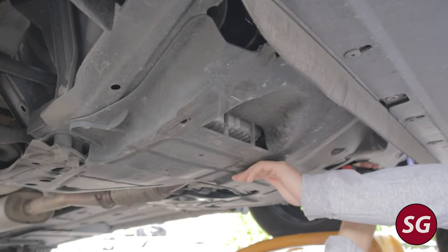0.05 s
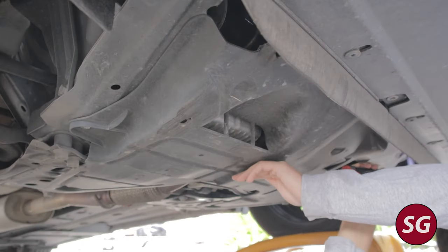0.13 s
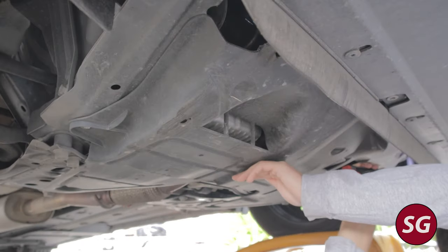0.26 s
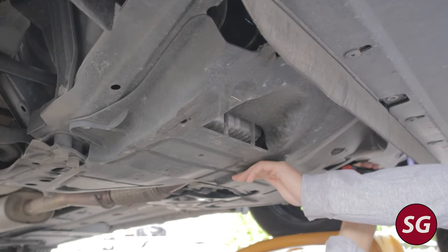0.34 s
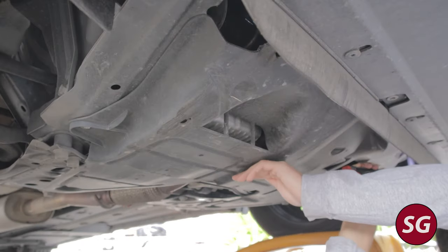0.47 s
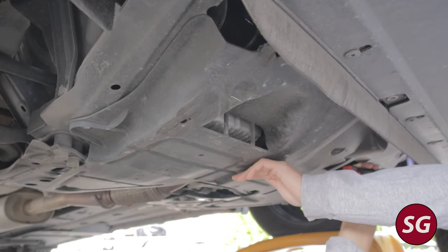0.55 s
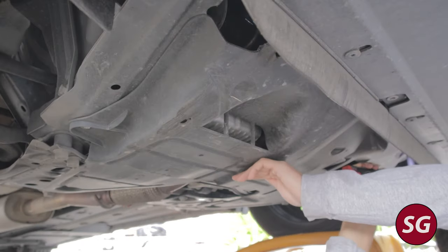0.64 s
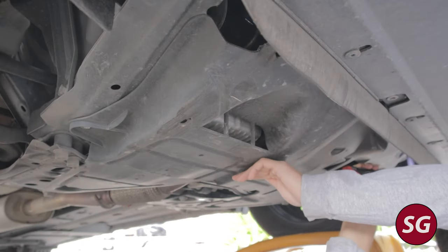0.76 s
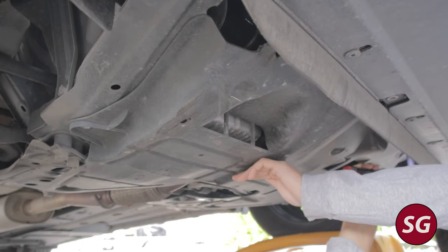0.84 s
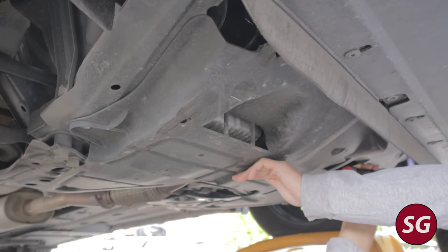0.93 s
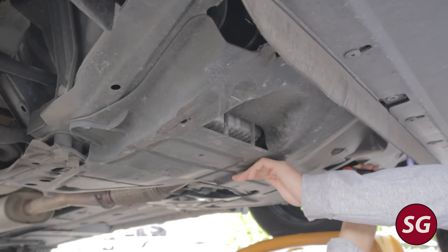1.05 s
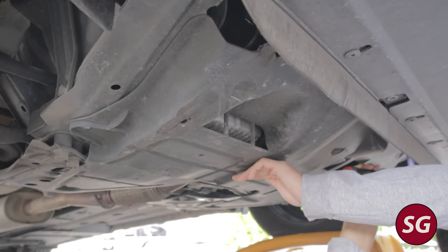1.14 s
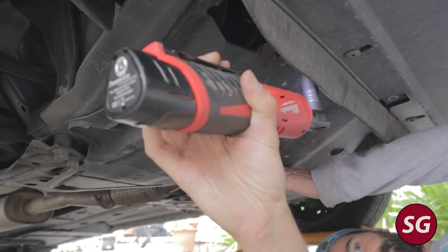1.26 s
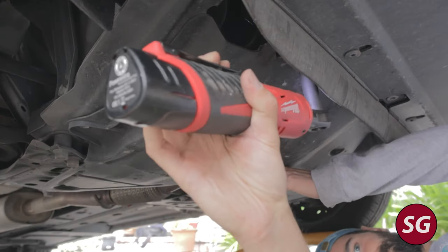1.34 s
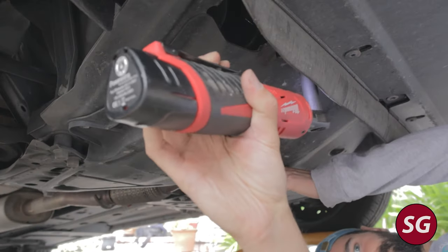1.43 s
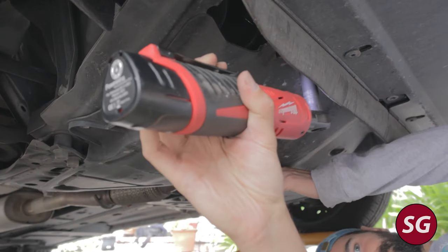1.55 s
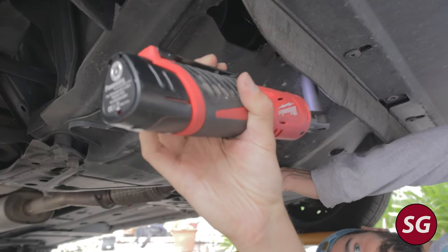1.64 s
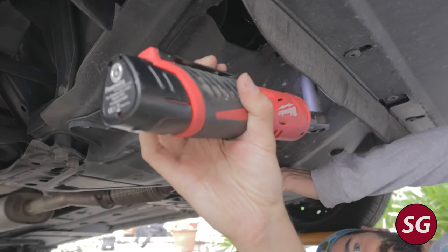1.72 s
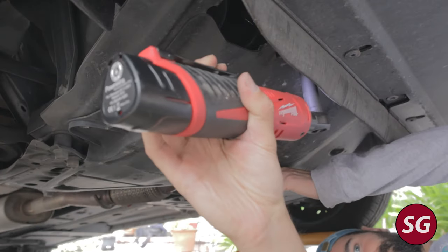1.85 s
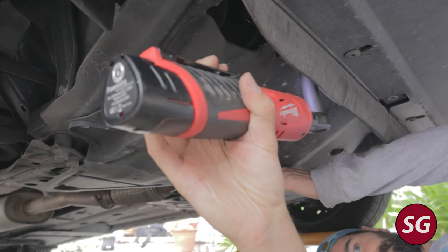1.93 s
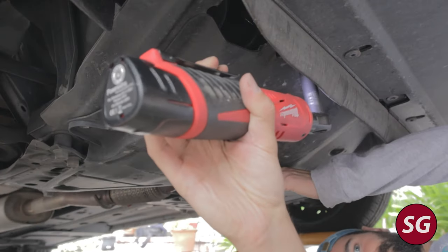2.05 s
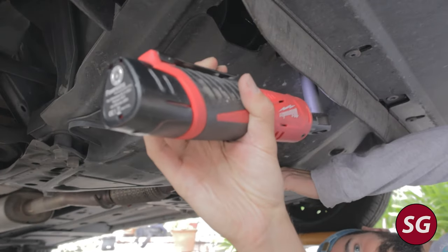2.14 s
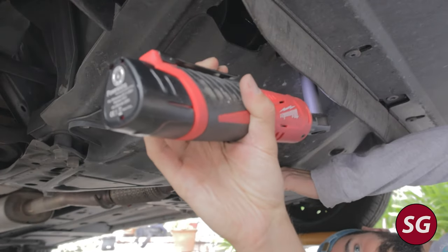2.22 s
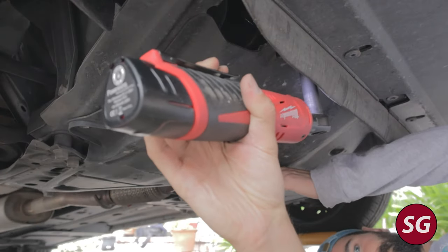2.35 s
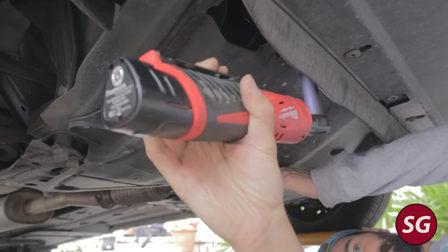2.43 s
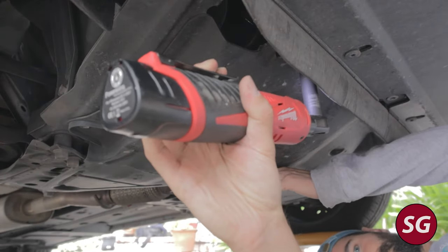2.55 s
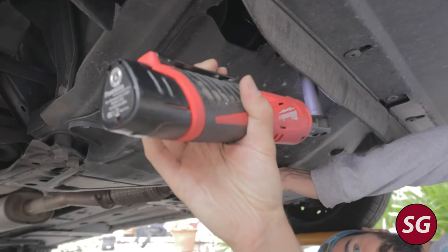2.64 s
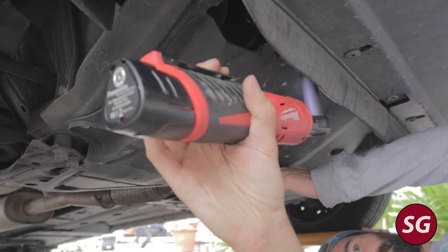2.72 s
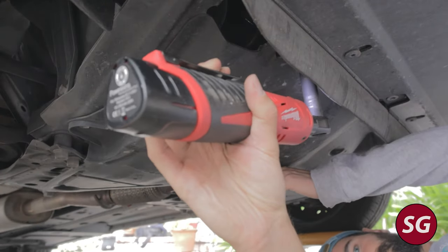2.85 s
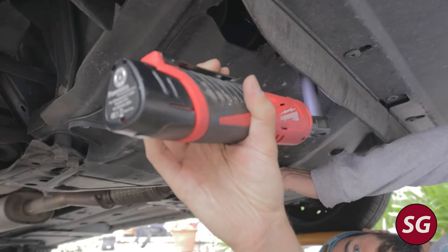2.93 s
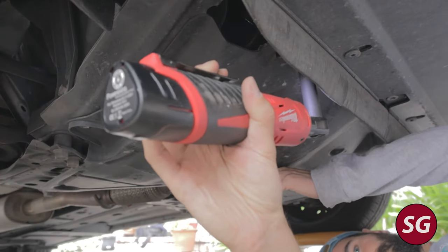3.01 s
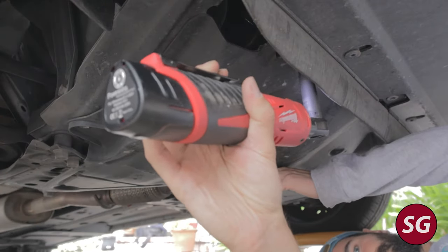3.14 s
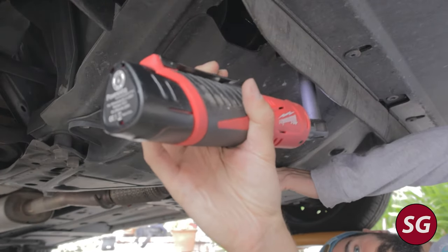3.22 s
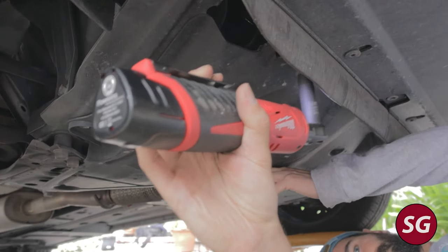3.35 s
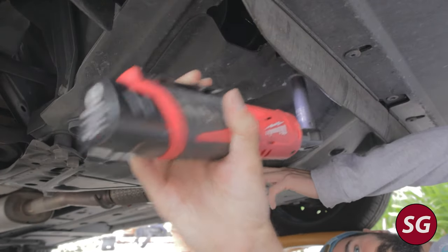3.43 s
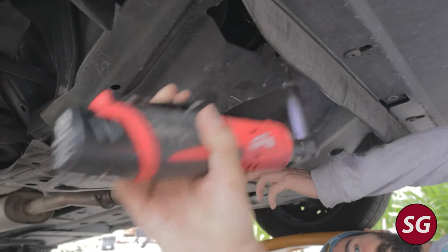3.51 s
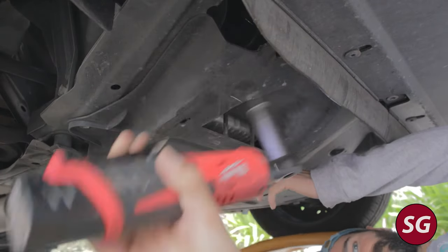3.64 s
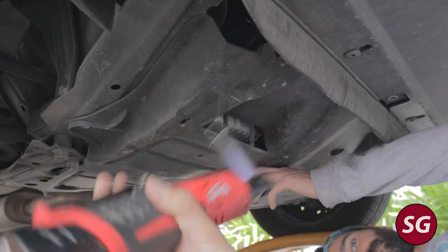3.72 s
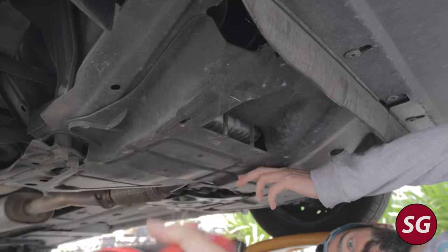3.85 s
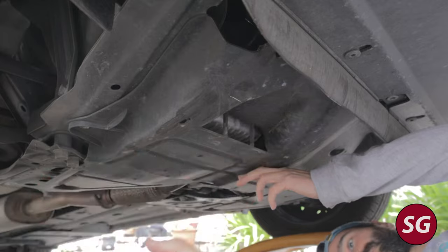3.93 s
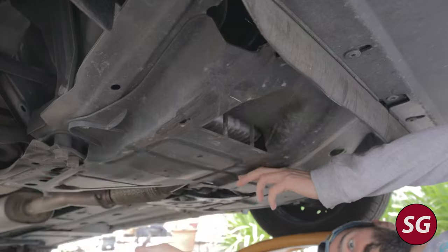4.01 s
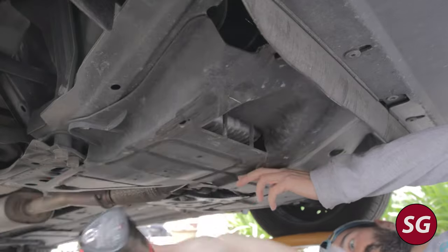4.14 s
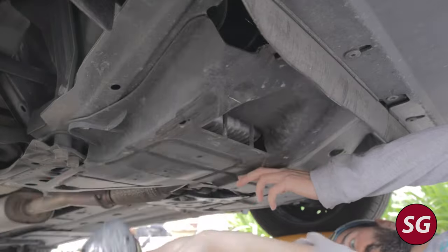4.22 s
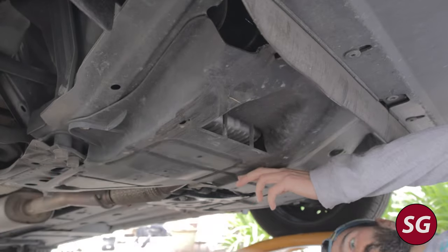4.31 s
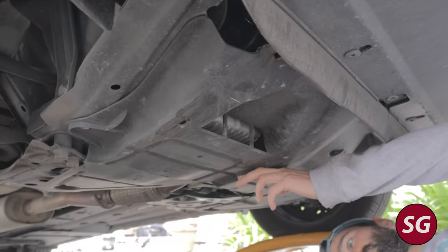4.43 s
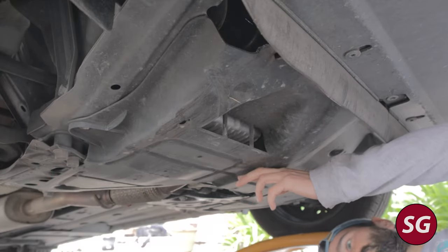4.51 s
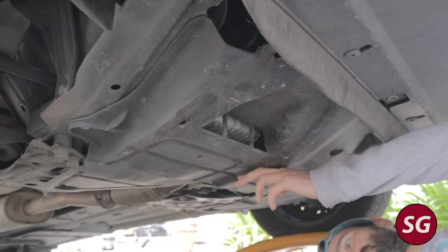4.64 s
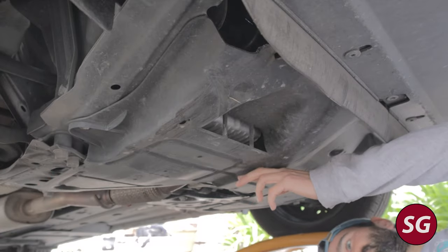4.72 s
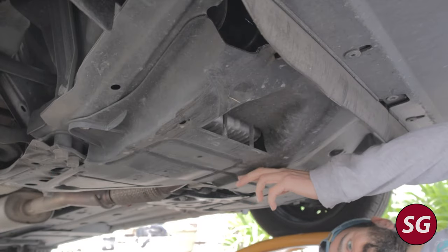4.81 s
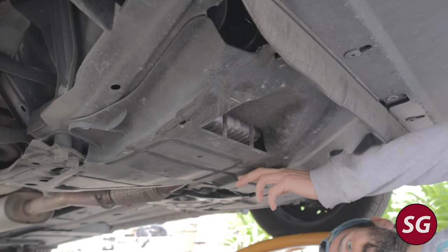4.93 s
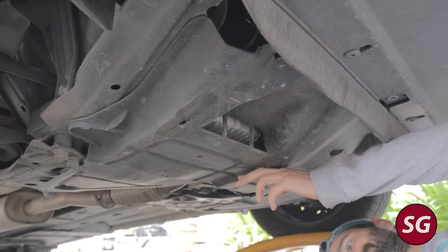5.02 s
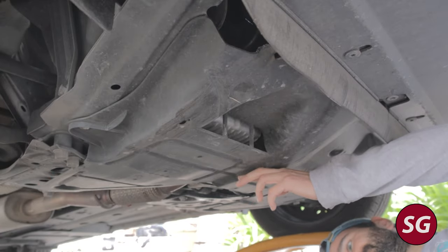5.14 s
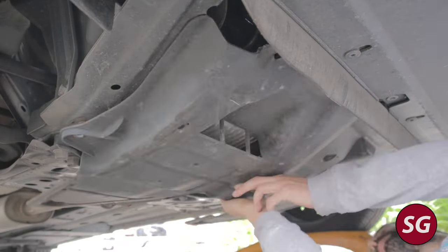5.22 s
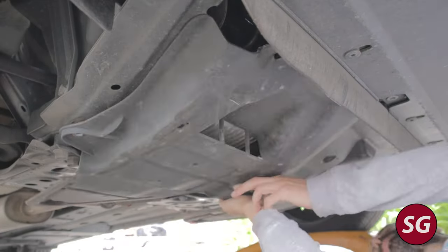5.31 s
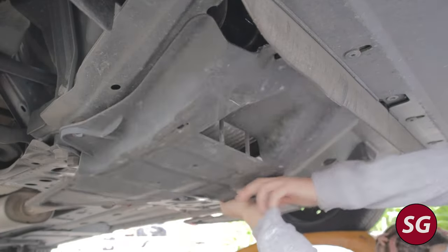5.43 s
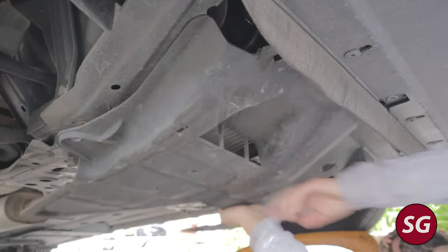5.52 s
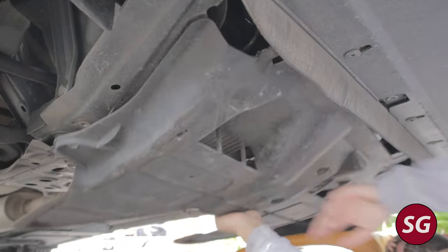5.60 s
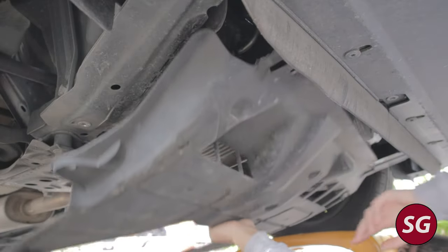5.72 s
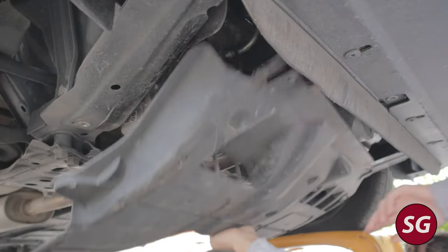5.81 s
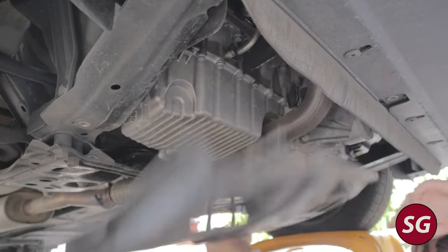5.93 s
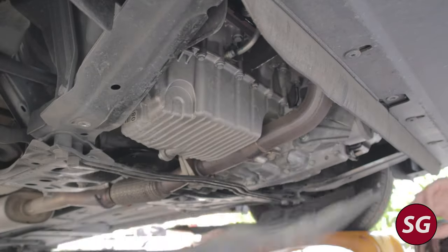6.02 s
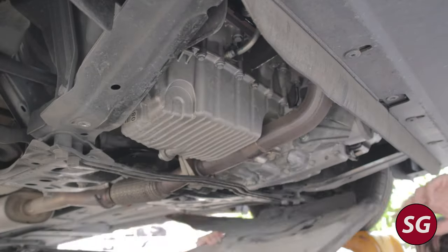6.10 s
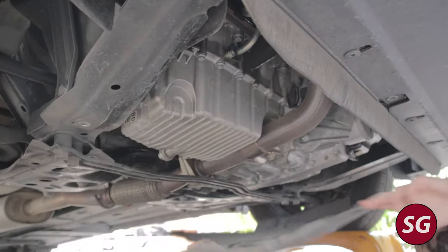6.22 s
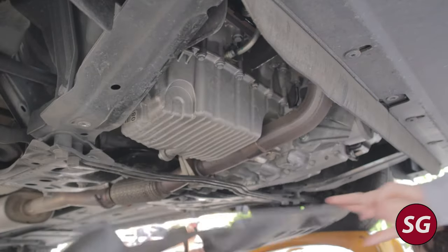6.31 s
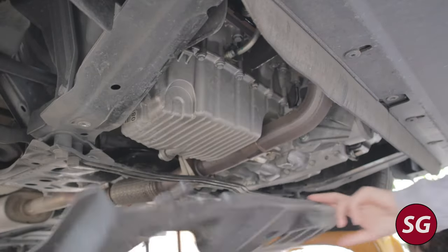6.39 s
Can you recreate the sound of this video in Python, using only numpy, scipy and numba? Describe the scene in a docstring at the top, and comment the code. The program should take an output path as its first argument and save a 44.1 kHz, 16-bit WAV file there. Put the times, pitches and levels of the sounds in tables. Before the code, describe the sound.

Close under a car in an open garage, a cordless ratchet rattles steadily on one bolt, then on a second with a slightly different metallic colour. Released, it slows to separate clicks and stops. Small steel taps follow in the quiet, then metal clanks with a short ring while a plastic shield is dragged away with scrapes, bumps and a last thump. Faint air beneath, mono and mostly dry.

```python
"""A cordless ratchet turns out two bolts of a car's splash shield in succession: periodic impacts of yoke,
pawl and gears excite the resonances of tool and underbody. The tool coasts to rest, its last teeth clicking.
Loose steel then taps, each contact exciting short damped modes. The plastic shield is dragged off by
stick and slip, bumping as it goes, while a piece of metal clanks down and rings in decaying modes.
Faint broadband air of an open garage lies beneath throughout."""
import sys
import numpy as np
from scipy import signal
from scipy.fft import rfft, irfft
from scipy.io import wavfile
from numba import njit

SR = 44100
rng = np.random.default_rng(int(sys.argv[2]) if len(sys.argv) > 2 else 0)


def master(y):
    """Save y as 16-bit WAV."""
    cut = np.clip(np.atleast_2d(y).T, -1, 1)
    pcm = np.round(cut * 32767)  # scale
    wavfile.write(sys.argv[1], SR, pcm.astype(np.int16))


N = 284930
T = np.arange(N) / SR  # time [s]
GRID = np.maximum(np.arange(4097) * SR / 8192, 1)  # frequencies of a response [Hz]
HALF_SECOND = SR // 2  # length of a single impact sound [samples]
TOP_HZ = 15800

# Garage air, spectrum: (frequency [Hz], level [dB])
AIR_SPECTRUM = [(18, -27.5), (30, -26.5), (92, -6), (185, -12.5), (247, -13.5), (511, -16.5), (735, -12.5),
                (815, -15), (978, -11), (1780, -22), (15000, -39.5)]
AIR_DB = -83

# Plastic shield, radiated spectrum: (frequency [Hz], level [dB])
SHIELD_SPECTRUM = [(24, -63), (60, 0.5), (150, -5.5), (227, -4.5), (300, -5.5), (410, -7.5), (540, -5.5),
                   (676, -6.5), (866, -5), (1080, -3), (1430, -11), (1800, -13.5), (2350, -17),
                   (3100, -21.5), (3850, -18.5), (4400, -20.5), (6460, -28), (15000, -34)]
# Effort of dragging the shield, which builds until it slips free: (time [s], scrape level [dB])
DRAG_EFFORT = [(5.25, -65), (5.33, -59), (5.5, -69.5), (5.57, -64.5), (5.68, -58.5), (5.75, -57),
               (5.82, -55.5), (5.843, -47.5), (5.865, -46.5), (5.895, -45), (5.915, -55), (5.96, -63),
               (6.22, -68), (6.46, -66.5)]
# Brief noisy swells: a soft handling rustle, the rattling tail of a tap, then scuffs of the shield:
# (time [s], length [s], level [dB])
NOISY_SWELLS = [(4.11, 0.11, -79), (4.988, 0.077, -64), (5.479, 0.18, -63), (5.813, .12, -74),
                (5.93, 0.38, -68.5), (6.407, 0.11, -59.5)]
SWELL_RISE = 0.14  # share of a noisy swell spent rising
# Grit relative to the scrape; flexing of the sheet under a light scrape, and its growth [dB per dB]
GRIT_DB, LIGHT_SCRAPE_DB, FLEX_DB, FLEX_GROWTH = -9.5, -58.5, -64.5, 0.38
# Bumps of the shield: (time [s], level [dB], ring [Hz], t60 [s])
SHIELD_BUMPS = [(4.195, -69, 168, 0.081), (5.251, -59, 216, 0.049), (5.292, -53, 324, 0.17),
                (5.333, -42.5, 151, 0.043), (5.336, -37.5, 624, 0.041), (5.339, -46, 334, 0.073),
                (5.35, -63, 560, .06), (5.38, -46.5, 127, 0.16), (5.451, -47, 174, 0.035),
                (5.453, -51, 620, 0.071), (5.535, -57, 1100, 0.026), (5.535, -52, 150, .05),
                (5.581, -58, 220, 0.046), (5.631, -59, 600, .06), (5.702, -45, 1270, 0.023),
                (5.76, -45, 232, 0.097), (5.787, -43, 600, 0.085), (5.806, -46, 230, 0.06),
                (5.8496, -35.5, 420, 0.03), (5.8502, -48, 1080, 0.02), (5.891, -42, 1050, 0.022),
                (5.8965, -32, 657, 0.022), (5.914, -40, 682, 0.081)]
# Judders of its catching edge: (time [s], length [s], level at the start [dB])
EDGE_SKIDS = [(5.547, 0.099, -59.5), (5.62, 0.037, -60), (5.662, 0.042, -60), (5.698, 0.14, -52.5),
              (5.805, 0.037, -47), (5.844, 0.039, -46), (5.888, 0.021, -46)]
# Modes of the juddering sheet: (frequency [Hz], width [Hz], level [dB])
SKID_MODES = [(603, 36, 1), (785, 34, -3), (1050, 42, -1), (1214, 41, 0), (1460, 46, -2)]

# Metal set down, with its bounces: (time [s], level [dB])
CLANK_IMPACTS = [(5.2871, -38.5), (5.288, -40.5), (5.295, -38.5), (5.301, -38.5), (5.309, -48),
                 (5.321, -59)]
# Modes of that metal: (frequency [Hz], level [dB], t60 [s])
CLANK_MODES = [(307, -2, .3), (598, -3, .25), (818, -7, .2), (953, -8, .24), (1114, 3, .72),
               (1324, -14, .37), (2050, -7, .3), (2740, -13, .2), (4000, -6, .08), (5260, 0, .11),
               (10040, -12, .2), (11630, -6, .12)]
# Spectrum of its crash: (frequency [Hz], level [dB])
CRASH_SPECTRUM = [(59, -64), (100, -24), (324, 8.5), (942, -30), (1090, -3), (3250, -10), (5260, -4.5),
                  (6760, -13.5), (11900, -20), (15000, -24)]

# Taps of loose steel and grit: (time [s], level [dB], main ring [Hz], second ring [Hz], treble [dB])
STEEL_CLICKS = [(4.058, -46, 2340, 4500, -6.5), (4.298, -59.5, 2000, 3660, -10),
                (4.38, -65, 1900, 1400, -16), (4.392, -51.5, 2400, 4000, 0), (4.398, -47.5, 2350, 3500, -5),
                (4.413, -49, 3530, 2300, -3), (4.417, -46, 4060, 2500, -3), (4.426, -46, 2080, 3500, -4),
                (4.43, -43, 3950, 3000, -1.5), (4.513, -64, 2690, 4000, -5), (4.592, -67, 2400, 3500, -11),
                (4.643, -40, 4000, 3450, 0), (4.6456, -42, 3800, 2300, -7.5),
                (4.744, -43.5, 3520, 2030, -3.5), (4.834, -66, 3000, 7000, 3), (4.84, -49, 2240, 3000, -17),
                (4.843, -37, 3900, 3050, 1.5), (4.9406, -41.5, 2600, 1800, -1.5),
                (4.992, -41, 5700, 8000, 14), (5.009, -42.5, 2430, 7500, 19), (5.021, -39, 3600, 2830, -2),
                (5.552, -50, 4970, 2300, 9), (5.703, -46, 3900, 2300, 3), (5.895, -37, 3780, 2700, -13),
                (6.075, -53, 11000, 5000, 2), (6.126, -53, 4030, 6000, 7), (6.416, -47, 3900, 5500, 13)]
# Resonances common to every tap: (frequency [Hz], width [Hz], level [dB])
CLICK_BODY = [(1320, 520, -8), (2100, 500, -6), (3050, 480, -5), (3830, 320, 1), (5700, 550, -7.5),
              (7500, 950, -17), (11700, 2300, -10)]

# Last teeth that the pawl drops over: (time [s], level [dB])
LAST_TEETH = [(3.63, -34), (3.656, -35), (3.685, -34), (3.7146, -34.5), (3.751, -37), (3.776, -38),
              (3.795, -42), (3.8245, -39), (3.833, -39), (3.843, -45), (3.892, -41), (3.909, -39.5),
              (3.927, -56), (3.981, -76)]

SECOND_BOLT_S, RELEASE_S = 1.2, 3.27  # work moves to the second bolt; the trigger is let go [s]
TEETH = 20  # crank turns to one turn of the bolt
# The two bolts: (start [s], end [s], a moment when tooth 0 engages [s], crank rate [turns per s])
BOLTS = [(0, SECOND_BOLT_S, .1883, 76.24), (SECOND_BOLT_S, 4, 1.4959, 76.06)]
# Motor speed after release, easing as the bolt leaves its thread: (time [s], share of full speed [1])
COAST_SPEED = [(3.275, 1), (3.33, .91), (3.4, .85), (3.48, .82), (3.55, .7), (3.63, .57), (3.75, .32),
               (3.9, .18), (3.98, 0)]
COAST_SOFTENING = 0.64  # the drive knock fades as speed to this power once the torque is gone
# Teeth that catch harder or slip on every turn, a list for each bolt: (tooth [1], level over a usual knock [dB])
TOOTH_CATCHES = [
    [(0, 3.5), (2, 1.5), (6, 3), (7, -2), (14, -2), (18, -2.5)],
    [(0, 3), (3, 2.5), (6, -1.5), (7, -2), (8, -2), (15, 2), (18, 1.5)],
]
# Knocks that stand out or slip, loaded and coasting: (time [s], level over a usual knock [dB])
HARD_KNOCKS = [(.1877, 3), (.2137, 5), (.2532, 2.5), (.2665, 5), (.3058, 1.5), (.4104, 4.5), (.5292, 5.5),
               (.6603, 4.5), (.7125, 1.5), (.9751, 5), (.9877, 4.5), (1.2195, 0.5), (1.2321, 5.5),
               (1.4296, 6.5), (1.4953, 4.5), (1.5352, 4.5), (1.601, -6), (1.64, 3.5), (1.7452, -0.5),
               (1.7584, 5), (1.7982, 2.5), (1.903, 1.5), (1.969, 5), (2.0213, 3.5), (2.232, 4), (2.2842, 1),
               (2.3905, 0.5), (2.495, 4), (2.5473, -0.5), (2.6265, -8.5), (2.7712, 0.5), (2.7843, 5),
               (2.8102, 2.5), (2.85, 3), (3.0603, 3.5), (3.1262, 2), (3.166, -6.5), (3.2706, 3.5),
               (3.3253, -2), (3.3392, 2.5), (3.4003, 6), (3.416, -6), (3.432, -10), (3.447, 1), (3.479, 0),
               (3.5125, 3), (3.5301, 5), (3.5483, 3), (3.5876, 1.5), (3.6088, 0)]
# Colour of the yoke's blow: (frequency [Hz], level [dB])
KNOCK_SPECTRUM = [(500, 5), (1300, 7), (2000, 1.5), (2800, 4.5), (3800, 1), (6000, -2.5), (12000, 3),
                  (15000, 6.5)]

# Resonances of tool and socket on the first bolt: (frequency [Hz], width [Hz], level [dB])
FIRST_BOLT_MODES = [(1387, 370, 1), (2000, 130, -10), (2410, 240, -5.5), (2977, 21, -2.5), (3330, 189, -8),
                    (4060, 440, -3), (4850, 180, -8), (5340, 580, -7.5), (11000, 1900, -17),
                    (12900, 160, -10), (13254, 780, -24), (14500, 620, -19)]
# The same on the second bolt: (frequency [Hz], width [Hz], level [dB])
SECOND_BOLT_MODES = [(1250, 300, -4), (1820, 470, -8.5), (2580, 100, -9), (2935, 43, -5.5),
                     (3420, 1600, -8), (3648, 100, -1.5), (3940, 18, 0.5), (5020, 69, -6),
                     (5170, 650, -8.5), (6680, 530, -14.5), (10630, 910, -16.5), (12320, 1300, -17.5),
                     (13670, 1095, -24.5), (15310, 1047, -38)]
# The same once the bolt hangs free: (frequency [Hz], width [Hz], level [dB])
FREE_BOLT_MODES = [(1220, 990, -8.5), (2480, 170, -4.5), (2880, 180, -2), (3610, 570, -0.5),
                   (5100, 440, -6), (5570, 370, -5), (6600, 390, -14), (10900, 1800, -14.5),
                   (13000, 1400, -14.5)]
UNLOADING_S = .3  # time after release in which the ring changes over
# Steel clatter on each bolt; its gain goes as speed to a power
FIRST_CLATTER_DB, SECOND_CLATTER_DB, CLATTER_POWER = -38.5, -39, 0.99
BITE_S, BITE_DB = 0.063, -2.5  # clatter starts this much weaker as the tool takes up the load

# Resonances of the underbody panel at the first bolt: (frequency [Hz], width [Hz], level [dB])
FIRST_PANEL_MODES = [(455, 120, -3.5), (600, 35, -4.5), (715, 49, 0), (890, 60, -2.5), (1010, 90, 1),
                     (1165, 140, 1.5), (1305, 70, 2), (1530, 100, 1)]
# The same at the second bolt: (frequency [Hz], width [Hz], level [dB])
SECOND_PANEL_MODES = [(558, 94, -5.5), (640, 54, 1), (795, 50, -6), (900, 170, -7), (1048, 150, -3),
                      (1235, 210, -0.5), (1476, 340, -3)]
# Underbody drone at the outset, its easing with time, and its power of speed
DRONE_DB, DRONE_FALL_DB_PER_S, DRONE_POWER = -43, 2.5, 0.86
FIRST_DRONE_DB, UNLOADED_DRONE_DB = -2.2, -2  # change on the first bolt, and once a bolt hangs free
# The wobbling socket swells the drone once a bolt turn, this long before tooth 0
FIRST_WOBBLE_DB, SECOND_WOBBLE_DB, WOBBLE_LEAD_S = 0.2, 0.4, 0.019
WOBBLE_SHARPNESS = 0.62  # share of a second swell per turn, which narrows the peak
# Pawl level also varies once a bolt turn, this share of a turn after the drone; negative inverts it
FIRST_PAWL_SWELL_DB, SECOND_PAWL_SWELL_DB, PAWL_LAG = 1.5, -0.6, .22
# Boom of the shaken shield on the first bolt: (frequency [Hz], level [dB])
FIRST_BOOM = [(40, -33), (76, -24.5), (110, -13), (155, 1), (230, -1.5), (275, -6.5), (380, 6), (480, -4),
              (650, -10.5), (1200, -51.5)]
# The same on the second bolt: (frequency [Hz], level [dB])
SECOND_BOOM = [(40, -32), (76, -10.5), (110, -8.5), (150, 0), (175, 10.5), (210, 2.5), (275, -0.5),
               (325, 3), (380, 3.5), (415, -3), (460, 4), (650, -5), (1200, -65.5)]
# Boom over the drone, uneven on the crooked bolt, flaring as the second comes free: (time [s], level [dB])
BOOM_GRIP = [(0, -16), (.06, -15.5), (.11, -7.5), (.18, -5.5), (.26, -6), (.34, -7.5), (.45, -4.5),
             (.58, -6.5), (.74, -4.5), (.88, -8), (1, -2), (1.08, -6), (1.25, -10), (2.9, -7), (3.14, -13),
             (3.3, -10), (3.345, -26), (3.42, -10.5), (3.48, -18), (3.53, -38)]
# Groans as the crooked first bolt binds:
# (centre time [s], length [s], level [dB], resonance at the start [Hz], at the end [Hz])
BINDING_SURGES = [(.16, .09, -49, 560, 760), (.18, .16, -41.5, 1050, 1400), (.42, .08, -46, 620, 1150),
                  (.465, .12, -40.5, 1150, 1500), (.67, .07, -46, 680, 620), (.72, .15, -45.5, 1050, 1550),
                  (.97, .1, -41.5, 1560, 1460)]


def undb(db):
    """Level in decibels to amplitude ratio."""
    return 10 ** (np.asarray(db) / 20)


def curves(table):
    """Linear interpolation: each column of a table as a continuous control over time."""
    s, *columns = np.transpose(table)
    return [np.interp(T, s, c) for c in columns]


def noise():
    """White noise: equal power at all frequencies, of unit variance."""
    return rng.standard_normal(N)


def unit(x):
    """Normalization to unit rms."""
    return x / np.std(x)


def running(x):
    """Normalization to unit rms over the first 3.3 s, while the motor runs at or near full speed."""
    return x / np.std(x[T < 3.3])


def play(x, response):
    """Convolution: a linear system answers each sample with its impulse response."""
    return signal.oaconvolve(x, response)[:N]


def cut(x, hz, kind, order=4):
    """Butterworth filtering, low-pass or high-pass."""
    return signal.sosfilt(signal.butter(order, hz, kind, fs=SR, output="sos"), x)


def waver(hz):
    """Random modulation: low-passed noise of unit rms."""
    return unit(cut(noise(), hz, "low", order=2))


def causal(gain):
    """Minimum phase: a folded cepstrum turns a gain over GRID into a causal response of unit energy."""
    cepstrum = irfft(np.log(gain + 1e-6))
    cepstrum[1:len(GRID) - 1] *= 2
    cepstrum[len(GRID):] = 0
    h = irfft(np.exp(rfft(cepstrum)))[:len(GRID)]
    return h / np.linalg.norm(h)


def colour(points):
    """Spectral envelope: the response with levels joined along log frequency."""
    hz, db = np.transpose(points)
    return causal(undb(np.interp(np.log(GRID), np.log(hz), db)))


def body(modes):
    """Modal superposition: the powers of overlapping resonance curves add."""
    power = 0
    for hz, width, db in modes:
        detuning = (GRID ** 2 - hz ** 2) / (GRID * width)
        power = power + undb(db) ** 2 / (1 + detuning ** 2)
    return causal(np.sqrt(power))


@njit
def moving_band(x, hz, width):
    """Time-varying resonance: a band-pass of moving centre, with unit gain there."""
    y, b, l = np.empty(len(x)), 0., 0.
    for i in range(len(x)):
        g, k = np.tan(np.pi * hz[i] / SR), width / hz[i]
        v = (b + g * (x[i] - l)) / (1 + g * (g + k))
        b, l, y[i] = 2 * v - b, l + 2 * g * v, k * v
    return y


def pulses(times, sizes):
    """Impulsive excitation: one unit sample, scaled, for each blow."""
    samples = np.clip(np.asarray(times) * SR, 0, N - 1).astype(int)
    return np.bincount(samples, sizes, N)


def chatter(blows, decay_s):
    """Contact chatter: each blow's energy is spread over a dying burst of tiny random contacts."""
    keep = np.exp(-2 / (decay_s * SR))
    energy = signal.lfilter([1 - keep], [1, -keep], blows ** 2 + 1e-24)
    return np.sqrt(energy) * noise()


def rebound(blows, lag_s):
    """Backlash: each blow strikes again after a short, varying delay."""
    at = np.flatnonzero(blows)
    lags = lag_s * (1 + .3 * np.tanh(waver(60)[at]))
    return pulses(at / SR + lags, blows[at])


def slips_at(rate_hz, jitter, spread_db):
    """Phase accumulation: each whole cycle of an unsteady rate releases one small impact."""
    phase = np.cumsum(rate_hz * np.exp(jitter * waver(200))) / SR
    return np.diff(np.floor(phase), prepend=0) * undb(spread_db * np.tanh(waver(400)))


def fade(t60):
    """Exponential damping: a fall of 60 dB in t60 seconds."""
    return np.exp(-np.log(1000) * T[:HALF_SECOND] / t60)


def burst(t60):
    """Broadband impact: exponentially damped noise."""
    return rng.standard_normal(HALF_SECOND) * fade(t60)


def add(out, s, sound, db):
    """Superposition: mix in a sound at time s with this peak level."""
    part = out[int(s * SR):][:len(sound)]
    part += (sound * undb(db) / np.abs(sound).max())[:len(part)]


def garage(x, wet_db, t60):
    """Reverberation: dense decaying reflections between floor and underbody join the direct sound."""
    late = T[:HALF_SECOND] > .003
    tail = cut(burst(t60) * late, 6000, "low", order=1)
    return x + undb(wet_db) * play(x, tail / np.linalg.norm(tail))


def air():
    """Broadband background: coloured noise of slowly varying level, the air of the open garage."""
    return unit(play(noise(), colour(AIR_SPECTRUM))) * undb(AIR_DB + 1.1 * waver(4.5))


def bending(rub, centre_hz=1000, width_hz=230.0, ring_db=1):
    """Resonance modulation: one mode of the sheet wanders in frequency as it bends."""
    wandering_hz = centre_hz * 2 ** (.7 * np.tanh(waver(9)))
    return rub + undb(ring_db) * moving_band(rub, wandering_hz, width_hz)


def crackle(db=-10.5, spread_db=4):
    """Granular excitation: single grains of dirt catch at random times under the sliding edge."""
    chance = rng.uniform(size=(700, 2)).T
    size_db = spread_db * np.minimum(-np.log(chance[1]), 2.5)
    grains = pulses(chance[0] * N / SR, undb(size_db))
    ring = body([(1450, 320, 0), (2300, 330, -15), (3900, 380, -7), (5400, 460, -10)])
    return undb(db) * unit(play(chatter(grains, decay_s=0.0023), ring))


def bumps(sheet, knock_db=-8):
    """Impact response: each bump of the sheet gives a broadband knock and one damped mode."""
    out = np.zeros(N)
    for s, db, hz, t60 in SHIELD_BUMPS:
        knock = signal.fftconvolve(burst(0.0067), sheet)[:HALF_SECOND]
        onset = 1 - fade(0.0019)
        ring = np.sin(2 * np.pi * hz * T[:HALF_SECOND]) * fade(t60) * onset
        add(out, s, ring + undb(knock_db) * knock / 2, db)
    return garage(out, wet_db=-7.5, t60=0.11)


def shield(grain_db=5, stick_db=0.5, swell_body_db=-7):
    """Sliding friction: tiny random slips excite the plastic sheet; brief noisy swells share its colour."""
    scrape_db, = curves(DRAG_EFFORT)
    dragging = np.clip((T - DRAG_EFFORT[0][0]) / 0.0085, 0, 1)
    swells = 0
    for s, length, db in NOISY_SWELLS:
        swells = swells + undb(db) * np.interp(T, [s, s + SWELL_RISE * length, s + length], [0, 1, 0])
    sheet = colour(SHIELD_SPECTRUM)
    slip_times = rng.uniform(0, N / SR, size=2500)
    slips = pulses(slip_times, undb(grain_db * np.minimum(rng.exponential(size=2500), 3)))
    rub = play(0.45 * unit(chatter(slips, decay_s=0.0016)) + noise(), sheet)
    # the sheet sticks and lets go as it slides
    sliding = dragging * undb(scrape_db + stick_db * waver(39))
    low_band = unit(cut(cut(bending(rub), 184, "high"), 3100, "low"))
    low_rub = np.hypot(sliding, undb(swell_body_db) * swells) * low_band
    # grit follows the scrape, and the swells have the same treble
    high_rub = np.hypot(undb(GRIT_DB) * sliding, swells) * unit(cut(rub, 2200, "high"))
    # flexing grows more slowly with effort than scraping
    flex_gain = dragging * undb(FLEX_DB + FLEX_GROWTH * (scrape_db - LIGHT_SCRAPE_DB))
    flex = flex_gain * unit(cut(cut(rub, 290, "low"), 75, "high", order=2))
    return low_rub + sliding * crackle() + high_rub + flex + bumps(sheet)


def skids(rate_hz=380, spread_db=3):
    """Stick-slip oscillation: the plastic edge starts to judder at once and runs out."""
    effort = 0
    for s, length, db in EDGE_SKIDS:
        envelope = np.interp(T, [s, s + .002, s + .6 * length, s + length], [0, 1, .6, 0])
        effort = effort + undb(db) * envelope
    judder = unit(chatter(slips_at(rate_hz, .4, spread_db), decay_s=0.00062))
    return cut(cut(play(effort * judder, body(SKID_MODES)), 2000, "low"), 370, "high")


def clank(ring_db=-39.5, crash_db=-2, build_s=0.033):
    """Free vibration: landing metal gives a short crash of bounces, then its modes decay."""
    out = np.zeros(N)
    for s, db in CLANK_IMPACTS:
        add(out, s, signal.fftconvolve(burst(0.023), colour(CRASH_SPECTRUM)), db + crash_db)
    out = garage(out, wet_db=0.0, t60=0.065)
    ring = 0
    for hz, db, t60 in CLANK_MODES:
        ring = ring + undb(db) * fade(t60) * np.sin(2 * np.pi * hz * T[:HALF_SECOND])
    add(out, CLANK_IMPACTS[0][0], ring * (1 - fade(build_s)), ring_db)
    return out


def clicks(ring_width_hz=520, ring_db=1.0, second_db=0, rattle=0.34):
    """Contact stiffness: steel taps share short modes, two rings depend on the spot, hardness adds treble."""
    out = np.zeros(N)
    for s, db, hz, second_hz, treble_db in STEEL_CLICKS:
        contact = rattle * burst(.013)
        contact[0] += 1
        modes = [(f, w, g + treble_db * (f > 5000)) for f, w, g in CLICK_BODY]
        modes += [(hz, ring_width_hz, ring_db), (second_hz, ring_width_hz, second_db)]
        tap = cut(signal.fftconvolve(contact, body(modes)), 890, "high")
        # a softer contact also has a lower upper limit
        limit_hz = min(8500 * undb(treble_db), 12000)
        add(out, s, cut(tap, limit_hz, "low", order=2), db)
    return garage(out, wet_db=-17.5, t60=0.11)


def last_teeth(echo_db=-11):
    """Impulse excitation: the coasting pawl drops over single teeth, ringing the unloaded tool."""
    out = np.zeros(N)
    ring = body(FREE_BOLT_MODES + [(12500, 510, -3.0)])
    for s, db in LAST_TEETH:
        add(out, s, signal.fftconvolve(burst(0.019), ring), db)
    return garage(out, wet_db=echo_db, t60=.12)


def motor_speed():
    """Rotor inertia: a steady share of full speed until release, then a coast to rest."""
    return curves(COAST_SPEED)[0]


def run_time():
    """Integrated speed: the seconds at full speed that would give the same rotation."""
    return np.cumsum(motor_speed()) / SR


def unloading():
    """Load release: the share, 0 to 1, by which the bolt hangs free."""
    return np.clip((T - RELEASE_S) / UNLOADING_S, 0, 1)


def each_bolt(first, second):
    """Piecewise control: one value on the first bolt and another on the second."""
    return np.where(T < SECOND_BOLT_S, first, second)


def on_bolt(x, first, second):
    """Change of boundary: a short crossfade from the response on one bolt to that on the other."""
    moved = np.clip((T - SECOND_BOLT_S) / 0.044 + .5, 0, 1)
    return play(x, first) * (1 - moved) + play(x, second) * moved


def strokes(phase, slop, spread_db, catches=((), ()), hard=()):
    """Periodic impact: one blow a crank turn at this phase; backlash varies its moment and force."""
    run_s = run_time()
    cycle = np.arange(-2 * TEETH, 10 * TEETH)
    out = 0
    for (start, end, zero_s, hz), caught in zip(BOLTS, catches):
        chance = rng.standard_normal((len(cycle), 2)).T
        times = np.interp(zero_s + (cycle + phase + slop * chance[0]) / hz, run_s, T)
        catch_db = sum(db * (cycle % TEETH == tooth) for tooth, db in caught)
        size_db = spread_db * np.tanh(chance[1] / 2) * 2 + (times < RELEASE_S) * catch_db
        for s, db in hard:
            nearest = np.argmin(np.abs(times - s))
            times[nearest], size_db[nearest] = s, db
        out = out + pulses(times, undb(size_db) * (times > start) * (times < end))
    return running(out)


def gears(speed, mesh_hz=700, spread_db=5, hiss=0.66):
    """Gear meshing: teeth tick at a rate proportional to motor speed, over steady hiss."""
    ticks = chatter(slips_at(mesh_hz * speed, .2, spread_db), decay_s=.0003)
    return running(ticks) + hiss * noise()


def contact_ring(x, speed, centre_hz=3050, sag_hz=550, width_hz=540.0, ring_db=-4):
    """Contact resonance: the socket's changing seat makes one ring jump; it sinks as the load comes off."""
    jump = 2 ** (.3 * np.tanh(waver(45)))
    return x + undb(ring_db) * moving_band(x, (centre_hz - sag_hz * (1 - speed)) * jump, width_hz)


def pawl():
    """Small stiff body: the pawl skips back over two teeth each crank turn and rings very high."""
    teeth = strokes(phase=.62, slop=.04, spread_db=4) + strokes(phase=.81, slop=.04, spread_db=4)
    ring = body([(12570, 250, 6.5), (13300, 600, 0.5), (6560, 1600, -12.0)])
    return play(0.44 * (teeth + chatter(teeth, decay_s=0.00033)), ring)


def steel_clatter(drive, rattle, bolt_turns, speed, pawl_db=-12, give=8.2):
    """Forced resonance: knocks and rattle ring tool and socket, and yielding joints limit the peaks."""
    free = unloading()
    # the yoke bounces in the slack of the socket
    contacts = .76 * drive + .46 * rebound(drive, lag_s=.0012)
    knock = play(contacts + .62 * chatter(drive, decay_s=.0017), colour(KNOCK_SPECTRUM))
    on_bolts = on_bolt(knock + rattle, body(FIRST_BOLT_MODES), body(SECOND_BOLT_MODES))
    loaded = cut(on_bolts, 1920, "high")
    unloaded = cut(play(knock + rattle, body(FREE_BOLT_MODES)), 900, "high")
    ring = contact_ring((1 - free) * running(loaded) + free * running(unloaded), speed)
    swell_db = each_bolt(FIRST_PAWL_SWELL_DB, SECOND_PAWL_SWELL_DB)
    press_db = swell_db * np.cos(2 * np.pi * (bolt_turns - PAWL_LAG))
    steel = running(running(ring) + undb(pawl_db + press_db) * pawl())
    return running(give * np.tanh(steel / give))


def underbody_drone(drive, rattle, grind_db=-5, panel_give=5):
    """Structure-borne sound: the socket drives the panel's modes, with soft saturation."""
    push = rebound(0.81 * drive, lag_s=.0014) + 0.29 * strokes(phase=.6, slop=.04, spread_db=2)
    force = push + rattle + undb(grind_db) * noise()
    panel = on_bolt(force, body(FIRST_PANEL_MODES), body(SECOND_PANEL_MODES))
    panel = running(cut(cut(panel, 1595, "low"), 457, "high"))
    return running(np.tanh(panel / panel_give))


def shield_boom(rumble_db=1):
    """Inertial forcing: the swinging yoke shakes the shield, giving a rough low buzz."""
    swing = strokes(phase=.02, slop=.022, spread_db=2.5) + undb(rumble_db) * noise()
    return running(on_bolt(swing, colour(FIRST_BOOM), colour(SECOND_BOOM)))


def motor_whine():
    """Frequency modulation: the motor's speed control sings unsteadily while the trigger is held."""
    trigger = each_bolt(.5, 1) * np.clip(1 - (T - RELEASE_S) / .07, 0, 1)
    return trigger * np.sin(2 * np.pi * np.cumsum(4004 + 5 * waver(25)) / SR)


def groan(blows, width_hz=270.0):
    """Gliding resonance: each time the bolt binds, the knocks swell in a moving mode of the panel."""
    out = 0
    for s, length, db, start_hz, end_hz in BINDING_SURGES:
        progress = np.clip((T - s) / length + .5, 0, 1)
        hz = start_hz + (end_hz - start_hz) * progress
        # two wider bands in series make one steep band
        band = moving_band(moving_band(blows, hz, 2 * width_hz), hz, 2 * width_hz)
        out = out + undb(db) * np.sin(np.pi * progress) * running(band)
    return out


def ratchet(scatter_db=0.6, return_db=-10, grind_db=-4.0, echo_db=-6.5, whine_db=-14):
    """Periodic excitation: a drive knock and a softer return knock each crank turn ring tool and underbody."""
    speed = motor_speed()
    run_s = run_time()
    turns = [(run_s - zero_s + WOBBLE_LEAD_S) * hz / TEETH for _, _, zero_s, hz in BOLTS]
    bolt_turns = each_bolt(*turns)
    drive = strokes(phase=0, slop=.012, spread_db=scatter_db, catches=TOOTH_CATCHES, hard=HARD_KNOCKS)
    drive = drive * speed ** COAST_SOFTENING
    back = strokes(phase=.72, slop=.04, spread_db=3)
    # return knocks, reflections from the underbody and grinding gears fill the gaps between drive knocks
    rattle = undb(return_db) * chatter(back, decay_s=0.0026)
    rattle = rattle + undb(echo_db) * chatter(drive, decay_s=0.0085)
    rattle = rattle + undb(grind_db) * gears(speed)

    bite_db = BITE_DB * np.clip(1 - T / BITE_S, 0, 1)
    clatter_db = each_bolt(FIRST_CLATTER_DB, SECOND_CLATTER_DB) + bite_db
    steel = steel_clatter(drive, rattle, bolt_turns, speed) + undb(whine_db) * motor_whine()
    clatter = undb(clatter_db) * speed ** CLATTER_POWER * steel

    swell = np.cos(2 * np.pi * bolt_turns) + WOBBLE_SHARPNESS * np.cos(4 * np.pi * bolt_turns)
    wobble_db = each_bolt(FIRST_WOBBLE_DB, SECOND_WOBBLE_DB) * swell
    load_db = each_bolt(FIRST_DRONE_DB, 0) + UNLOADED_DRONE_DB * unloading()
    drone_db = DRONE_DB - DRONE_FALL_DB_PER_S * T + wobble_db + load_db
    grip_db, = curves(BOOM_GRIP)
    low_sound = underbody_drone(drive, rattle) + undb(grip_db) * shield_boom()
    drone = undb(drone_db) * speed ** DRONE_POWER * low_sound
    return clatter + drone + groan(chatter(back, decay_s=0.016) + noise() / 50)


def scene():
    """Superposition: the pressures of all sources add in one channel."""
    return (air() + shield() + skids() + clank() + clicks() + last_teeth() + ratchet())[None]


def record(dry):
    """Band limiting: an elliptic low-pass cuts steeply above TOP_HZ."""
    return signal.sosfilt(signal.ellip(10, .2, 70, TOP_HZ, fs=SR, output="sos"), dry)


dry = scene()
out = record(dry)
master(out)
```